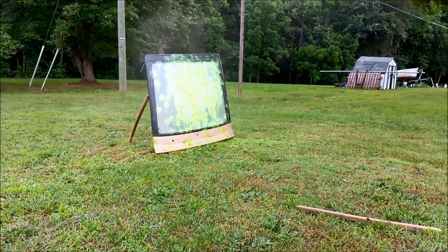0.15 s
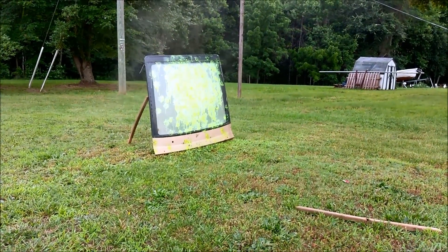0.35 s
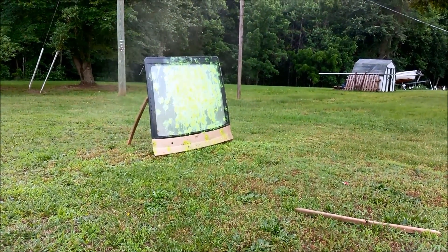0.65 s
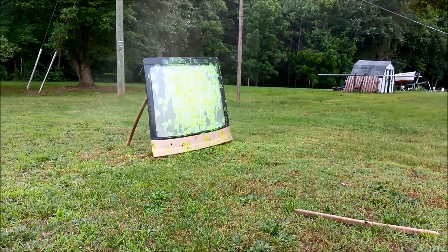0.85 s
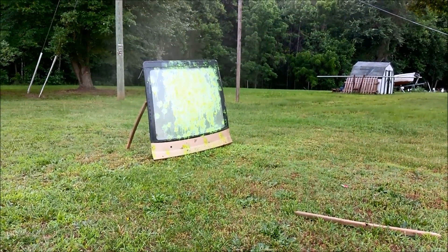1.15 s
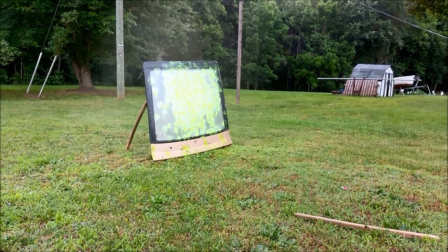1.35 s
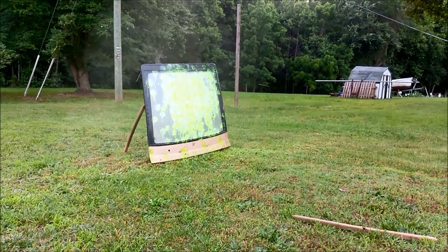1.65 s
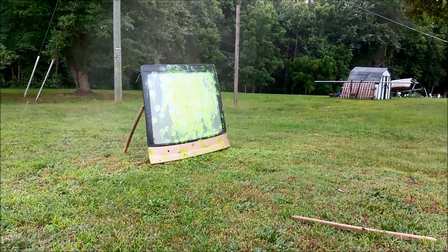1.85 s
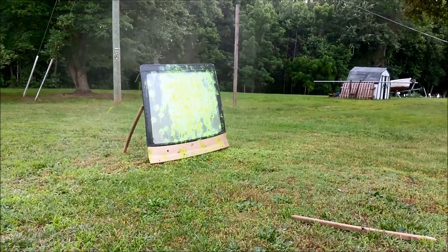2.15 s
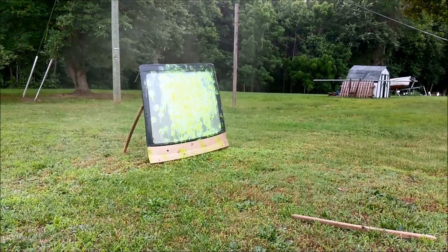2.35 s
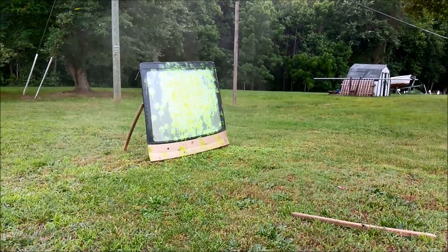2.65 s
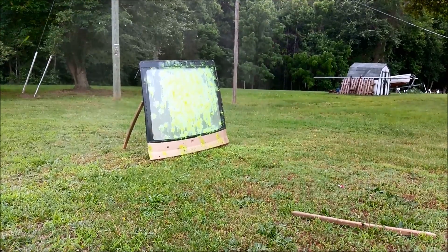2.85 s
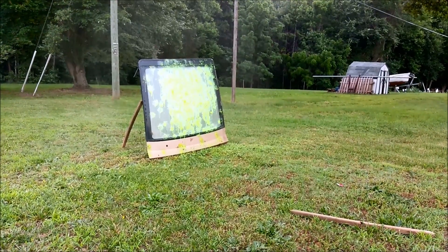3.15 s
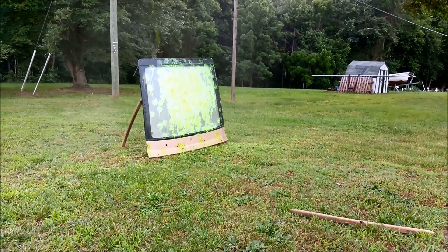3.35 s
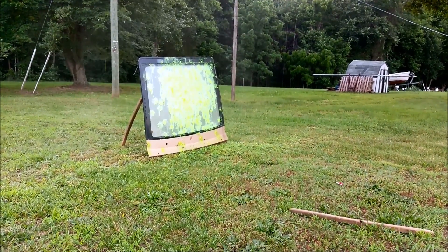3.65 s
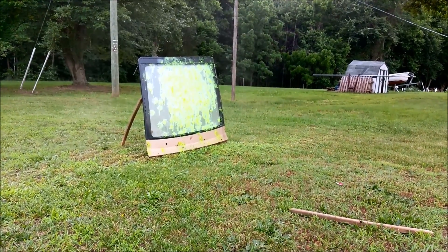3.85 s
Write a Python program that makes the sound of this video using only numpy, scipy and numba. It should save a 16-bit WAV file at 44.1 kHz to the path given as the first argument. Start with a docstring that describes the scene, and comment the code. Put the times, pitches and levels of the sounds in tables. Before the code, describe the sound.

Paintballs burst on a glass panel on an open lawn: a few separate shots, then a dense rapid volley with sharp cracks and wet splats, ending in an outdoor wash; close, loud phone stereo with squashed peaks.

```python
"""Garden lawn, wall on the right, trees beyond: a paintball marker to the right fires bursts at a glass panel.
Shots are gas puffs ringing a barrel; each ball's burst is a crack, a grainy paint spray and panel modes.
The wall returns delayed splats; sheds and trees leave a long wash of banded decaying noise.
A quiet garden hush lies beneath, with faint ticks after the firing.
Two phone ports of opposite polarity hear it through a fast gain control; the left overloads lopsidedly."""
import sys
import numpy as np
from scipy import signal
from scipy.fft import rfft, irfft
from scipy.io import wavfile
from scipy.ndimage import uniform_filter1d
from numba import njit

SR = 44100
rng = np.random.default_rng(int(sys.argv[2]) if len(sys.argv) > 2 else 0)


def volts_from_db(level):
    """Convert decibel levels to linear amplitude ratios."""
    exponent = np.asarray(level, float) / 20
    return 10 ** exponent


def dump(signal):
    """Clip the signal to [-1, 1] and save it as 16-bit WAV at the path in sys.argv[1]."""
    limited = np.clip(np.atleast_2d(signal).T, -1, 1)
    pcm = np.round(limited * 32767).astype(np.int16)
    wavfile.write(sys.argv[1], SR, pcm)


N = 176400
LEAD_S = 0.6  # sound already in the air before the start
LEAD_SAMPLES = int(LEAD_S * SR)
TOTAL_SAMPLES = N + LEAD_SAMPLES

# garden hush spectrum: f/Hz, level/dB
GARDEN_SPECTRUM = [(20, -22), (124, -7), (440, -18.5), (1390, -22), (15500, -41.5)]
# faint ticks after the firing: t/s
FAINT_TICKS_S = [3.374, 3.615, 3.745]
# balls bursting on the panel before the start: t/s, crack level/dB
EARLY_HITS = [(-.09, 2)]
# balls bursting on the panel: t/s, crack level/dB
HITS = [(0.0117, -8), (0.0642, -8), (0.1465, -6), (0.2461, -8), (0.4884, -6), (0.7477, -4), (0.8749, -6),
        (0.9863, -2), (1.1167, -6.5), (1.1675, -4), (1.2278, -2), (1.2809, -6), (1.3359, -0.5),
        (1.3902, -2), (1.4391, -3.5), (1.4987, -3), (1.5496, -7), (1.5977, -8), (1.6423, -8),
        (1.7016, -6.5), (1.7565, -3), (1.8032, -3), (1.864, -4.5), (1.9159, -7.5), (1.969, -6.5),
        (2.0264, -3), (2.0745, -6), (2.1415, -8), (2.1922, -5.5), (2.2358, -7.5), (2.342, -6.5),
        (2.5673, -8)]
# splat spectrum: f/Hz, level/dB
SPLAT_SPECTRUM = [(180, -60.5), (300, -4.5), (923, 0.5), (1480, 5.5), (2210, -1), (4850, -2.5),
                  (5550, -6.5), (9180, -3.5), (16000, -16.5)]
# panel modes: f/Hz, level/dB, t60/s
PANEL_MODES = [(113.3, -26, 0.17), (165.3, -27, 0.28), (231, -25, .09), (339.3, -36, 0.31),
               (1480, -14, .028)]
# wash from sheds and trees: f/Hz, left level/dB, right level/dB, far t60/s
WASH_BANDS = [(206, -30.5, -35, 0.6), (477, -30, -31.5, 0.65), (1117, -42, -40.5, 2.6),
              (1484, -36, -38.5, 1.87), (2800, -33, -32.5, 0.99), (3680, -32.5, -29, 1.45),
              (5600, -29.5, -32, 0.85), (7300, -40.5, -41, 1.2), (11700, -46, -53.5, 1.3)]
# wall echo delays of the hits: t/s
HIT_ECHO_DELAYS_S = (.0519, .0758)
# wall echo levels of the hits, one row per delay: right level/dB, left level/dB
HIT_ECHO_LEVELS = [(3, -23), (-12, -28)]
# port response to sound from the side: f/Hz, level/dB
SIDE_PORT_RESPONSE = [(900, -23.5), (3200, -17), (3750, -18), (4700, -8.5), (6500, -20), (11000, -61.5)]
# marker shots: t/s, level/dB
SHOTS = [(.3243, 0), (.5771, 3.5), (.71, 4), (.8234, -0.5), (.9546, -3), (1.0096, -2.5), (1.064, 2.5),
         (1.117, 3.5), (1.169, -5.5), (1.2238, 2), (1.2783, -4), (1.3338, 2), (1.388, -5), (1.4405, -0.5),
         (1.4868, -7), (1.5408, -1.5), (1.5916, -1.5), (1.6424, -1), (1.6975, 0), (1.7503, -1), (1.803, 5),
         (1.863, 2), (1.916, -7.5), (1.9808, -1.5), (2.027, -2), (2.0732, 0), (2.1893, -22.5),
         (2.4076, 0.5)]
# barrel and body modes: f at the start/Hz, left level/dB, right level/dB, t60 before the shut-off/s
MARKER_MODES = [(1040, -2, -2, .05), (1950, -9, -6, .03), (3200, -9, -4, .02)]
# echoes of the shots: delay/s, right level/dB, left level/dB
SHOT_ECHOES = [(0.0411, -9, -11.5)]
# short low bumps where loud sound overloads the left port lopsidedly: t/s, level/dB
OVERLOAD_BUMPS = [(1.641, -0.5), (1.7003, 0), (1.7572, -1.5)]

HUSH_DB, FAINT_TICK_DB, ALIKE_BELOW_HZ = -55, -51, 603
CRACK_DB, PANEL_DB, SHOT_DB = 9.5, 23.5, -4
FIRST_CRACK_DB, SPRAY_T60_S, SPRAY_GRAIN_DB, SPRAY_UNSHARED = 15, 0.027, 10, 0.46
WANDER_RAD_PER_SAMPLE = 0.05  # roughens the modes
SWING_CYCLES = 1.7  # the pane takes this long to get swinging
NEAR_T60_S, WASH_START_S, WASH_RISE_S = 0.46, 0.035, 0.0096
FAR_DB, TREES_BUILD_S, TREES_END_S, PAST_TREES_DB, SHOT_WASH_DB = -7.5, 0.31, 0.58, -3.5, -8
PORT_PEAK_HZ, PORT_PEAK_DB = 3700, -5
PUFF_S, MARKER_HISS_DB, HISS_T60_S = 0.00004, -18.5, 0.067
SAG_PER_S = 45  # the ring drops in pitch as the gas leaves
SHUT_S = 0.0043  # the ring dies away quickly after this
BUMP_PEAK_S = 0.0012
HIT_LAG_SAMPLES, TREBLE_LAG_SAMPLES, SIDE_LAG_SAMPLES, SPLIT_HZ = 3, 2, 17, 5000
KNEE_DB, RATIO, ATTACK_S, RELEASE_S, LEFT_DB = -6, 2.24, 0.00044, 0.024, -2.5


def colour(x, points):
    """Minimum-phase filter through (f/Hz, level/dB) points."""
    p = np.array(points, float)
    log_hz = np.log(np.fft.rfftfreq(2048, 1 / SR) + 1)
    db = np.interp(log_hz, np.log(p[:, 0]), p[:, 1])
    cepstrum = irfft(db * np.log(10) / 20)
    # folding the cepstrum makes the filter causal
    cepstrum[1:1024] *= 2
    cepstrum[1025:] = 0
    h = irfft(np.exp(rfft(cepstrum)))
    h = h.reshape((1,) * (x.ndim - 1) + (-1,))
    return signal.fftconvolve(x, h, axes=-1)[..., :x.shape[-1]]


def fade(t, t60):
    """Exponential decay, -60 dB at t60."""
    return np.exp(-np.log(1000) * t / t60)


def lay(rows, times):
    """Each row of sound starts at its time."""
    out = np.zeros(TOTAL_SAMPLES + rows.shape[1])
    for row, s in zip(rows, times):
        i = int((s + LEAD_S) * SR)
        out[i:i + len(row)] += row
    return out[:TOTAL_SAMPLES]


def late(x, samples):
    """Pure delay."""
    return np.concatenate([np.zeros(int(samples)), x])[:TOTAL_SAMPLES]


def pair(size):
    """Noise at both ports: mostly alike in the bass, unrelated above."""
    a = rng.standard_normal((3, size))
    b_low, a_low = signal.butter(1, ALIKE_BELOW_HZ, fs=SR)
    return a[:2] + signal.lfilter(b_low, a_low, a[2] - 0.5 * a[:2])


def garden():
    """Coloured noise hush whose level breathes slowly, plus faint decaying noise ticks."""
    hush = colour(pair(TOTAL_SAMPLES), GARDEN_SPECTRUM)
    steps = np.repeat(rng.standard_normal(TOTAL_SAMPLES // 4000 + 1), 4000)
    swell = uniform_filter1d(steps, 4000)[:TOTAL_SAMPLES]
    hush *= volts_from_db(HUSH_DB + 1.3 * swell) / hush.std()
    t = np.arange(400) / SR
    burst = rng.standard_normal((len(FAINT_TICKS_S), len(t))) * fade(t, 0.015)
    tick = colour(burst, [(1500, -31), (4000, 17), (9000, -9)])
    return hush + volts_from_db([[-3], [0]]) * lay(volts_from_db(FAINT_TICK_DB) * tick, FAINT_TICKS_S)


def splats():
    """The shell cracks, paint sprays in grains for some ms, the panel rings and thumps."""
    s, db = np.array(list(EARLY_HITS) + list(HITS), float).T[:, :, None]
    starts_s = s[:, 0]
    t, t_long = np.arange(1500) / SR, np.arange(12000) / SR
    shape = np.minimum(0.71 + t / 0.0014, 1) * fade(t, SPRAY_T60_S)  # full after 0.4 ms
    size = (len(s), len(t))

    def grain():
        """Noise with a random level at every sample."""
        return rng.standard_normal(size) * volts_from_db(SPRAY_GRAIN_DB * rng.standard_normal(size))

    shared = grain() * shape
    shared[:, 0] += volts_from_db(FIRST_CRACK_DB)
    dull = rng.random((len(s), 1))  # some balls burst wetter and darker
    spray = []
    for _ in range(2):
        burst = colour(shared + SPRAY_UNSHARED * grain() * shape, SPLAT_SPECTRUM)
        burst = burst + dull * (uniform_filter1d(burst, size=3) - burst)
        spray.append(lay(volts_from_db(db + CRACK_DB) * burst, starts_s))
    # at a distance each splat counts as one crack
    far = colour(lay(volts_from_db(db + CRACK_DB + 17.5), starts_s), SPLAT_SPECTRUM)

    panel = np.zeros((2, len(s), len(t_long)))
    for f, level_db, t60 in PANEL_MODES:
        luck = rng.standard_normal((len(s), 4)).T[:, :, None]
        wander = np.cumsum(WANDER_RAD_PER_SAMPLE * rng.standard_normal((len(s), len(t_long))), axis=1)
        turn = 2 * np.pi * f * (1 + f / 20000 * luck[0]) * t_long + wander
        swing = np.minimum(f * t_long / SWING_CYCLES, 1)
        envelope = volts_from_db(db + PANEL_DB + level_db + 3 * luck[1]) * fade(t_long, t60) * swing
        for k in range(2):  # each port meets the mode with its own phase
            phase = 0.17 * luck[2 + k] * np.minimum(turn, 1)
            panel[k] += envelope * np.sin(turn + phase)
    return far, np.array(spray), np.array([lay(p, starts_s) for p in panel])


def wash(x):
    """Scatter from near things dies fast; the far trees build up, last longer, then step down."""
    t = np.arange(int(1.6 * SR)) / SR
    past_trees = 1 / (1 + np.exp((TREES_END_S - t) / 0.01))
    shape = np.clip((t - WASH_START_S) / WASH_RISE_S, 0.05, 1) * volts_from_db(PAST_TREES_DB * past_trees)
    noise = rfft(pair(len(t)))
    log_hz = np.log(np.fft.rfftfreq(len(t), 1 / SR) + 1)
    centres = np.log([w[0] for w in WASH_BANDS])
    tail = 0
    for k, (_, left_db, right_db, far_t60) in enumerate(WASH_BANDS):
        weight = np.interp(log_hz, centres, np.arange(len(WASH_BANDS)) == k)
        band = irfft(noise * weight, len(t))
        far = volts_from_db(FAR_DB) * np.minimum(t / TREES_BUILD_S, 1) * fade(t, far_t60)
        tail = tail + volts_from_db([[left_db], [right_db]]) * band * (fade(t, NEAR_T60_S) + far)
    return signal.fftconvolve(x[None], tail * shape, axes=1)[:, :TOTAL_SAMPLES]


def wall(hit):
    """Slap echoes from the right, with a narrow port resonance; the right port hears them first."""
    b_peak, a_peak = signal.iirpeak(PORT_PEAK_HZ, 20, SR)
    heard = colour(hit, SIDE_PORT_RESPONSE) + volts_from_db(PORT_PEAK_DB) * signal.lfilter(b_peak, a_peak, hit)
    out = np.zeros((2, TOTAL_SAMPLES))
    for delay_s, (right_db, left_db) in zip(HIT_ECHO_DELAYS_S, HIT_ECHO_LEVELS):
        out[0] += volts_from_db(left_db) * late(heard, delay_s * SR + SIDE_LAG_SAMPLES)
        out[1] += volts_from_db(right_db) * late(heard, delay_s * SR)
    return out


def marker():
    """A short puff of gas rings the barrel on a falling pitch; the right port hears it first."""
    s, db = np.array(SHOTS).T
    t = np.arange(3000) / SR
    puff = np.exp(-0.5 * ((t[:40] - 3 * PUFF_S) / PUFF_S) ** 2)
    hiss = volts_from_db(MARKER_HISS_DB) * rng.standard_normal((len(s), len(t))) * fade(t, HISS_T60_S)
    pitch_luck = 1 + 0.04 * rng.standard_normal((len(s), 1))
    turn = 2 * np.pi * np.log(1 + SAG_PER_S * t) / SAG_PER_S * pitch_luck
    ports = []
    for side in (1, 2):
        ring = sum(volts_from_db(m[side]) * np.cos(m[0] * turn) * fade(t, m[3]) for m in MARKER_MODES)
        body = ring / puff.sum() * np.exp(-(t / SHUT_S) ** 4)
        body[:, 0] += 1  # the puff itself
        ports.append(lay(volts_from_db(SHOT_DB + db[:, None]) * signal.lfilter(puff, 1, body + hiss), s))
    out = np.array([late(ports[0], SIDE_LAG_SAMPLES), ports[1]])
    dull = uniform_filter1d(ports[0], size=12)
    for delay_s, right_db, left_db in SHOT_ECHOES:
        out = out + volts_from_db([[left_db], [right_db]]) * late(dull, delay_s * SR)
    return out


def overload_bumps():
    """Short low bumps in the left port alone, where loud sound overloads it lopsidedly."""
    s, db = np.array(OVERLOAD_BUMPS).T[:, :, None]
    t = np.arange(800) / SR / BUMP_PEAK_S
    return lay(-volts_from_db(db) * t * np.exp(1 - t), s[:, 0]) * np.array([[1], [0]])


def scene():
    """Direct sound, wall echoes, wash and garden at the two ports."""
    shot = marker()
    far, spray, panel = splats()
    left, right = spray + panel
    low = signal.filtfilt(*signal.butter(2, SPLIT_HZ, fs=SR), right)
    right_late = late(low, HIT_LAG_SAMPLES) + late(right - low, TREBLE_LAG_SAMPLES)
    near = shot + np.array([left, right_late]) + overload_bumps()
    scattered = wash(far + volts_from_db(SHOT_WASH_DB) * shot[0])
    return (near + wall(right) + scattered + garden())[:, LEAD_SAMPLES:]


@njit
def follow(x, attack, release):
    """Level follower: rises fast, sinks slowly."""
    e, y = x[0], np.empty(len(x))
    for i in range(len(x)):
        e += (x[i] - e) * (attack if x[i] > e else release)
        y[i] = e
    return y


def band_limit(x):
    """A steep low-pass at the top of the band."""
    return signal.sosfilt(signal.butter(12, 16970, fs=SR, output="sos"), x)


def record(dry):
    """Deep bass is cut, gain ducks just after loud peaks, peaks round off; right port wired in reverse."""
    dry = signal.lfilter(*signal.butter(2, 60, "high", fs=SR), dry)
    env = follow(np.abs(dry).max(axis=0), 1 / (ATTACK_S * SR), 1 / (RELEASE_S * SR))
    gain = np.minimum(1, volts_from_db(KNEE_DB) / (env + 1e-9)) ** (1 - 1 / RATIO)
    ports = dry * gain * [[volts_from_db(LEFT_DB)], [-1]]
    mix = 0.56 * np.tanh(ports / 1.146)
    return band_limit(mix)


dry = scene()
out = record(dry)
dump(out)
```